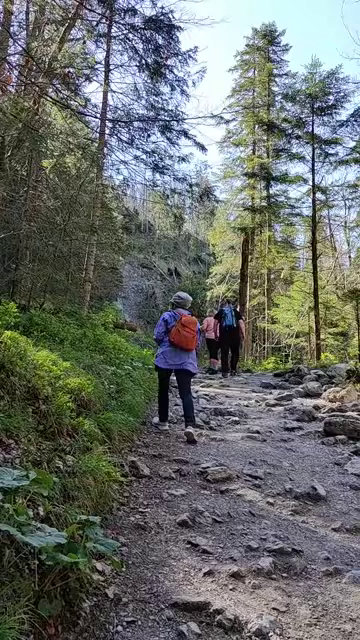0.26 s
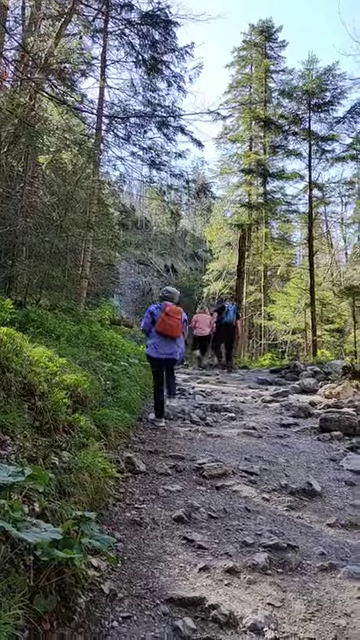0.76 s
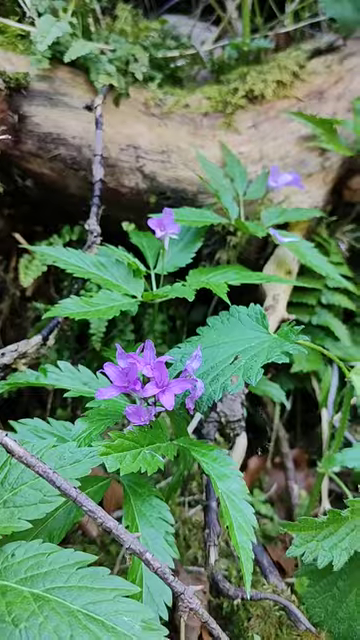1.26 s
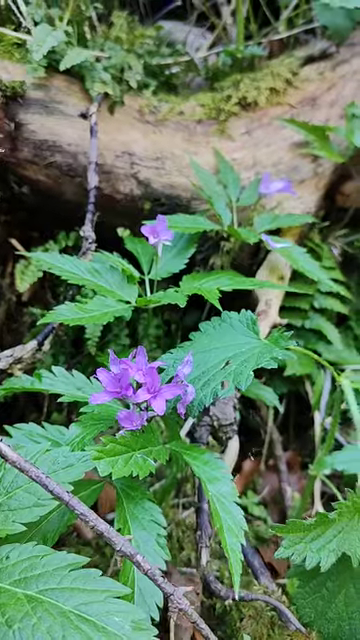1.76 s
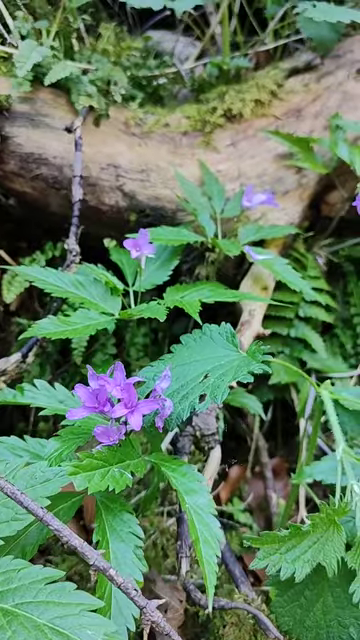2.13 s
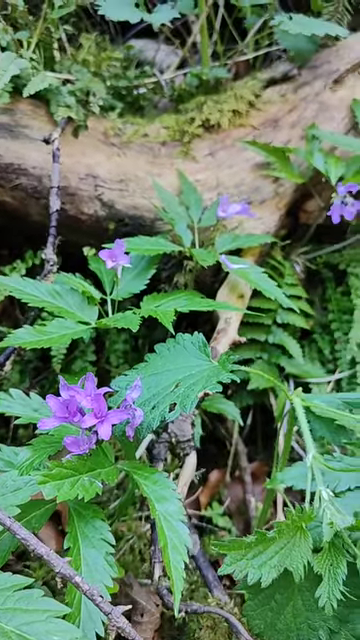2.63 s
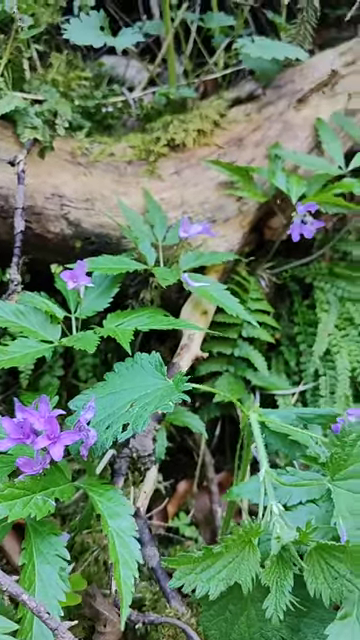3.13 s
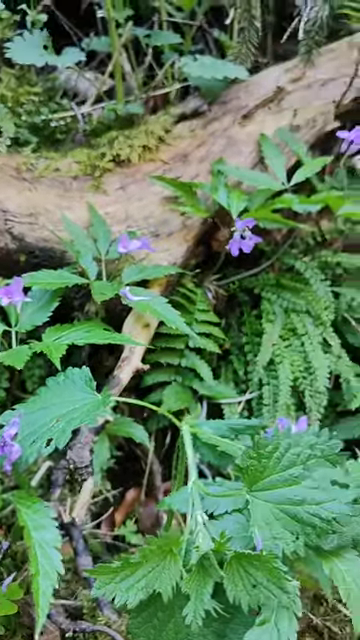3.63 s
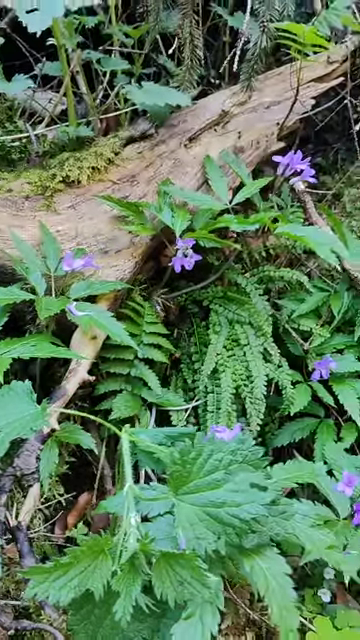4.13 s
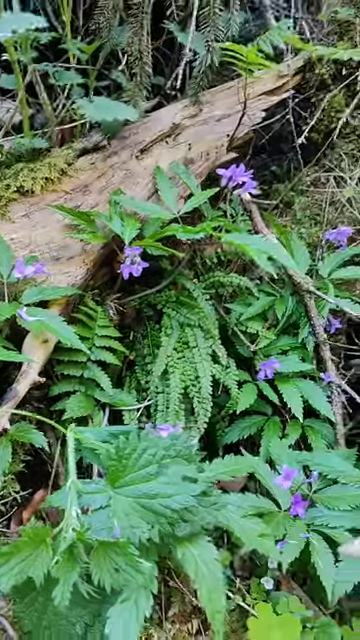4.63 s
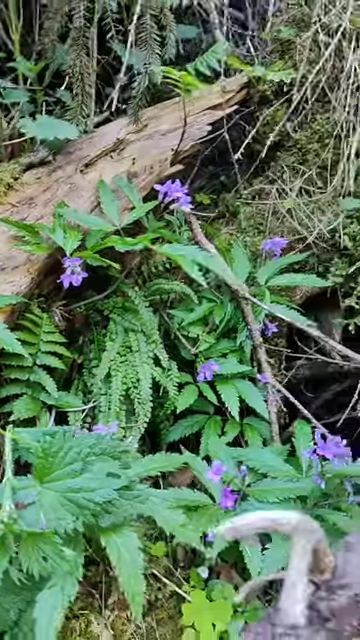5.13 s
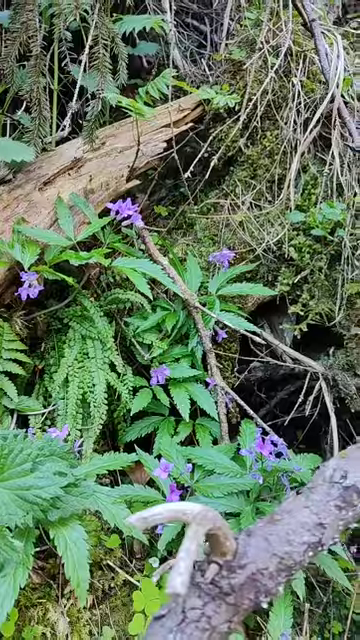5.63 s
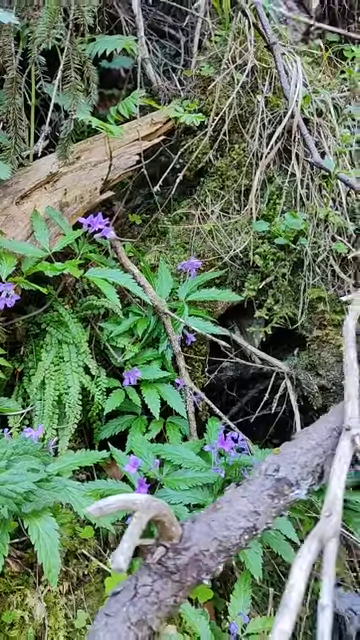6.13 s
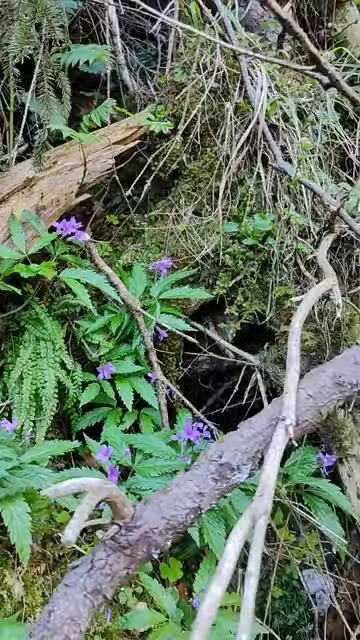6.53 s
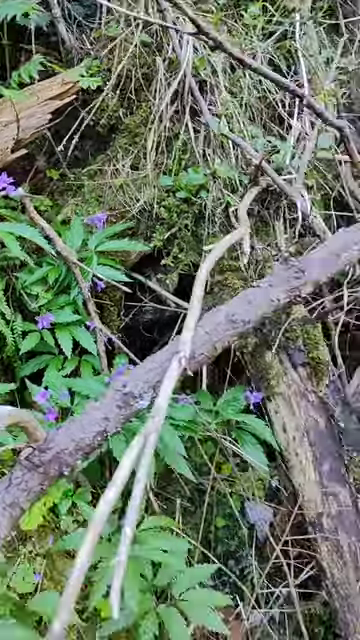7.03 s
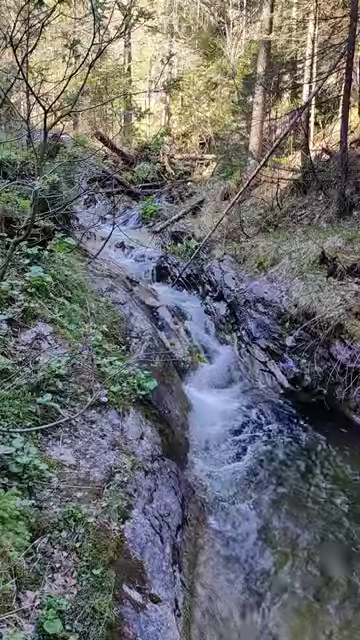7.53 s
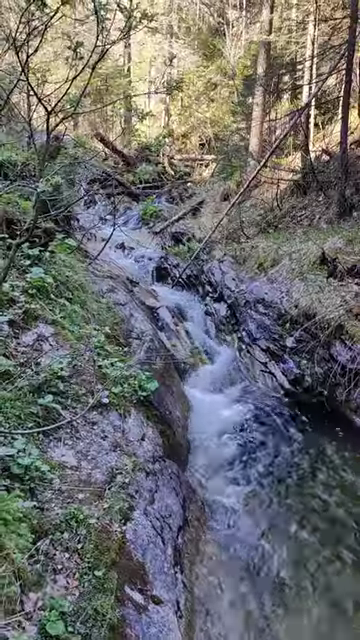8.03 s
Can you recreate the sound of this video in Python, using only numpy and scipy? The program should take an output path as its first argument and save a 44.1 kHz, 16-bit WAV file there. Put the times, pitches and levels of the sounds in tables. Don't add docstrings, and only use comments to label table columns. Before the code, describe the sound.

Outdoor stereo sound from a handheld phone: a smooth, thin water rush beside a trail cuts off abruptly, then a nearer stream fades in by a mossy bank. A clustered snap and knock stands out early, followed by scattered drops, hollow glugs and weak far bird notes. After a second short silence the water returns much louder, a full cascade with quick burbles and sharp splashes until the end.

```python
import sys
import numpy as np
from scipy import signal
from scipy.fft import rfft, irfft, next_fast_len
from scipy.io import wavfile
from scipy.ndimage import uniform_filter1d

SR = 44100
rng = np.random.default_rng(int(sys.argv[2]) if len(sys.argv) > 2 else 0)


def transcribe(u):
    v = np.clip(np.atleast_2d(u).T, -1, 1)
    q = np.round(v * 32767).astype(np.int16)
    wavfile.write(sys.argv[1], SR, q)


def undo_db(level):
    steps = np.asarray(level, float) / 20
    return 10 ** steps


N = 365148

# start in seconds, end in seconds.
PLACES = [
    (0, 1.2025),
    (1.2503, 7.1175),
    (7.1582, 8.3),
]
# frequency in Hz, gain in dB.
PORTS = [
    [(1000, -16), (1900, -14), (3400, -27), (4200, -27.5), (5000, -39.5), (5700, -56), (6500, -58),
     (6800, -42), (7500, -33.5), (10500, -37.5), (12000, -31.5), (12800, -65), (14200, -91), (15200, -65)],
    [(1000, -14.5), (1650, -11.5), (2800, -22.5), (3500, -25.5), (4500, -25), (5700, -31.5), (6300, -28.5),
     (6800, -34.5), (7100, -42.5), (8600, -37), (10500, -35.5), (12800, -24), (14800, -18), (15700, -23.5)],
]


def evened(x):
    return x / np.sqrt(np.mean(abs(x) ** 2) + 1e-20)


def read(points, hz, column=1):
    table = np.transpose(points)
    return np.interp(np.log(hz + 1), np.log(table[0] + 1), table[column])


def add(mix, s, sound):
    part = mix[:, round(s * SR):][:, :sound.shape[-1]]
    part += sound[..., :part.shape[-1]]


def sides(pan_db):
    return undo_db(np.array([[pan_db / 2], [-pan_db / 2]]))


def foam(length, share, spread_db):
    size, bubbles = next_fast_len(length + 8192), 0
    per_s, cycles, rise, count = 5000, 6.06, .15, 26
    for hz in np.geomspace(150, 15000, count):
        u = np.arange(int(3 * cycles * SR / hz)) * hz / SR / cycles
        tone = np.sin(2 * np.pi * cycles * (u + rise * u ** 2 / 2))
        ring = tone * np.exp(-2.3 * u) * np.minimum(u / 0.089, 1)
        many = int(per_s / count * np.sqrt(hz / 1500) * length / SR)
        when, chance = rng.random((many, 2)).T
        strength = undo_db(spread_db * np.minimum(-np.log(chance), 5))
        births = np.bincount((when * length).astype(int), strength, length)
        bubbles = bubbles + evened(rfft(births, size) * rfft(ring, size)) * np.sqrt(hz)
    bubbles = bubbles / np.sqrt(uniform_filter1d(abs(bubbles) ** 2, size=size // 400))
    near = np.sqrt(share) * evened(irfft(bubbles)[:length])
    blur = np.sqrt(1 - share) * rng.standard_normal(length)
    return signal.stft(near + blur, nperseg=1024, noverlap=768)[2]


def rush(k):
    # time in seconds, rush in dB, turn of the phone to the pool from 0 to about 1.
    flow = [
        [(0.0, -41, 0.6), (0.6, -40.5, .5), (1.19, -40, 0.43)],
        [(1.55, -37.5, .1), (2.3, -37.5, .2), (3.0, -37.5, 0.07), (3.8, -38, 0.4), (4.5, -38, 0.52),
         (5.4, -37, 0.48), (6.1, -38.2, .65), (6.75, -39, 0.83), (7.1, -38.5, 1.1)],
        [(7.42, -30, 0.57), (7.84, -29, .4), (8.28, -29, 0.35)],
    ]
    # frequency in Hz, level in dB per Hz.
    water = [
        [(25, -23.7), (80, -15.5), (180, 2), (240, -3.5), (310, 1), (410, -6.2), (500, -11), (720, -10.5),
         (950, -4), (1350, -6), (2350, -0.0), (2900, -1.5), (5200, -2.1), (13000, -3.8)],
        [(25, -25), (80, -2), (180, -0.5), (240, -6), (310, 6), (410, 1.2), (500, -6.5), (720, -4.5),
         (950, 1.34), (1350, -0.3), (2350, 1), (2900, -0.64), (5200, 0.0), (13000, -0.5)],
        [(25, -16), (80, -4.5), (180, 7), (240, 3.5), (310, 11.5), (410, 7.9), (500, 4), (720, 6), (950, 11.5),
         (1350, 6), (2350, 10.5), (2900, 8.5), (5200, 10.5), (13000, 8)],
    ]
    # frequency in Hz, left minus right in dB.
    leaning = [
        [(60, 0), (300, 1.5), (800, -0.5), (1500, 4), (2350, -8.5), (2900, -7), (4000, -1.5), (5300, -5.5),
         (7000, -4), (9000, -3.8), (12000, 4), (13800, 4)],
        [(60, -1.8), (300, 3), (800, 2), (1500, -1.4), (2350, -0.2), (2900, 2.7), (4000, -0.4), (5300, 1.2),
         (7000, 0), (9000, -0.7), (12000, 0), (13800, 0.3)],
        [(60, 0.5), (300, 2), (800, 1), (1500, 0.6), (2350, -6.5), (2900, 4), (4000, -3.5), (5300, -1.5),
         (7000, -1), (9000, -2), (12000, 4), (13800, 2.5)],
    ]
    # frequency in Hz, likeness from 0 to 1, lead of right in radians.
    likeness = [
        [(170, 1, -0.5), (430, 0.98, 0.5), (690, 0.72, 0.0), (1000, 0.61, -0.5), (1400, 0.6, -1),
         (1800, 0.3, 1.5), (2400, 0.6, 0.4), (3400, 0.3, 1.5), (5000, 0.07, 4)],
        [(170, 0.91, 0.0), (428, 0.92, 0.08), (690, 0.69, 0.47), (1000, 0.61, 0.25), (1400, 0.51, -0.5),
         (1850, 0.5, -1.5), (2400, 0.04, -2), (3400, 0.07, -4), (5000, 0.01, -6)],
        [(170, 0.99, 0.0), (430, 0.91, 0.2), (690, 0.8, 0), (1000, 0.6, 0.4), (1400, 0.46, 0.1),
         (1800, 0.46, 0.7), (2370, 0.42, -0.1), (3400, 0, -0.7), (5000, 0.12, -0.4)],
    ]
    # bubble share from 0 to 1, bubble size spread, patch and flicker in dB.
    texture = [
        (.3, 2.5, 1, .5),
        (.4, 2.5, 0.68, 0.55),
        (.45, 2, 1, 0.75),
    ]
    share, spread_db, patch_db, flicker_db = texture[k]
    start, end = PLACES[k]
    length = round((end - start) * SR)
    left, other = foam(length, share, spread_db), foam(length, share, spread_db)
    hz = np.fft.rfftfreq(1024, 1 / SR)
    t = start + np.arange(left.shape[1]) * 256 / SR

    same = np.clip(read(likeness[k], hz), 0, 1)[:, None]
    lead = np.exp(1j * read(likeness[k], hz, column=2))[:, None]
    right = same * lead * left + np.sqrt(1 - same ** 2) * other
    z = np.array([left, right])

    lean = read(leaning[k], hz) / 2
    ports_db = np.array([read(PORTS[0], hz) + lean, read(PORTS[1], hz) - lean])
    bass_loss = np.clip(hz / 45, 0, 1) ** 2
    z = z * (undo_db(read(water[k], hz) + ports_db) * bass_loss)[..., None]
    body = (hz > 500) & (hz < 3000)
    z = z / np.sqrt(4 / 3 * np.sum(np.mean(abs(z.mean(0)[body]) ** 2, 1)))

    s, *columns = np.transpose(flow[k])
    rush_db, turn = (np.interp(t, s, c) for c in columns)
    chance = rng.standard_normal(left.shape[::-1]).T
    slow = [evened(uniform_filter1d(row, size=30)) for row in chance[1:5]]
    field = rush_db + 0.4 * slow[-1]
    # band edges in Hz, effect of the turn in dB, wander in dB.
    bands = [([130, 200, 250, 290], 6.5, 1.5),
             ([250, 290, 460, 560], 3.5, 1),
             ([2500, 4500, 20000, 30000], 4, 0.57)]
    for (edges, turn_db, wander_db), drift in zip(bands, slow):
        reach = np.interp(hz, edges, [0, 1, 1, 0])
        field = field + np.outer(reach, turn_db * (turn - turn.mean()) + wander_db * drift)
    patches = uniform_filter1d(uniform_filter1d(chance, size=12, axis=0), size=12, axis=1)
    field += patch_db * evened(patches)
    field += flicker_db * evened(uniform_filter1d(chance[0], size=3))
    return signal.istft(z * undo_db(field), nperseg=1024, noverlap=768)[1][:, :length]


def strike(db, hz, cycles, pan_db):
    u = np.arange(round(cycles * SR / hz)) / (cycles * SR / hz)
    pulse = np.sin(np.pi * u) * np.cos(2 * np.pi * cycles * (u - .5))
    scattered = rng.random((2, 900)) < .02
    echoes = rng.standard_normal((2, 900)) * scattered * undo_db(-11 - np.arange(900) * 0.025)
    echoes[:, 0] = -1
    sound = signal.fftconvolve(echoes, pulse[None], axes=1)
    return undo_db(db) * sides(pan_db) * np.pad(sound, ((0, 0), (22, 0)))


def drops(mix):
    # start in seconds, peak in dB, pitch in Hz, left minus right in dB.
    falling = [(.752, -31.5, 2110, -4), (2.604, -26, 1300, -2), (2.666, -29, 1650, -3),
               (2.713, -26, 1410, -3), (3.153, -26, 1620, 2), (3.4, -27, 1580, -3), (3.585, -26, 1230, -1),
               (3.679, -27, 1410, 3), (4.82, -34, 1040, -1), (4.852, -29, 1040, -1), (5.351, -32, 960, 2),
               (5.609, -28, 1020, -2), (5.786, -29, 990, -1)]
    for s, db, hz, pan_db in falling:
        add(mix, s, strike(db, hz, 4.7, pan_db))


def tick(middle_db, treble_db):
    spray_t60_s = 0.015
    t, hz = np.arange(1024) / SR, abs(np.fft.fftfreq(1024, 1 / SR))
    spray = rng.standard_normal((2, 1024)) * undo_db(1 - 60 * t / spray_t60_s)
    spray[:, 0] = 1
    ports = undo_db(np.array([read(port, hz) for port in PORTS]))
    treble = np.clip((hz - 6500) / 1500, 1e-3, 1 - 1e-3)
    middle = (1 - treble) * np.clip(hz / 4000, .05, 1) ** 2
    sound = 0
    for db, band in ((middle_db, middle), (treble_db + 8.0, treble)):
        minimum_phase = np.conj(signal.hilbert(np.log(ports * band), axis=1))
        ring = np.fft.ifft(np.exp(minimum_phase), axis=1).real
        part = signal.fftconvolve(spray, ring, axes=1)
        sound = sound + undo_db(db) * part / abs(part.mean(0)).max()
    return np.pad(sound, ((0, 0), (40, 0)))


def ticks(mix):
    # start in seconds, peak of the middle in dB, level of the treble in dB (8 below its peak).
    splashes = [(1.4674, -43, -42), (2.5925, -24.5, -26.5), (2.5984, -30, -40), (2.6663, -34, -44),
                (2.8334, -45, -41), (3.1704, -44, -39), (3.3634, -41, -38), (3.3884, -41, -34),
                (3.6894, -39, -43.5), (4.1729, -30.5, -44), (4.2946, -38, -41), (5.3148, -30, -41),
                (5.5598, -34, -47), (5.917, -29, -47), (6.3724, -37, -31), (6.4028, -32, -40),
                (6.4647, -37, -44), (6.8294, -40, -33), (7.4294, -30, -42), (7.7817, -21, -27),
                (8.0691, -28, -36.5), (8.1334, -23, -33)]
    for s, middle_db, treble_db in splashes:
        add(mix, s, tick(middle_db, treble_db))


def pops(mix):
    # start in seconds, peak in dB, pitch in Hz, length in cycles, left minus right in dB.
    snaps = [(2.5745, -23, 1150, 2.6, -1), (2.578, -11, 1050, 2.3, -1.5), (2.582, -20, 1400, 3, -2),
             (2.586, -19, 1570, 4, -3), (2.5895, -22, 1900, 3, -2), (2.5912, -19, 1100, 2, -1),
             (2.596, -27, 1700, 4, -1), (5.315, -16, 1330, 2.4, -1.5), (5.783, -19.5, 1500, 2.2, -1)]
    for s, *row in snaps:
        add(mix, s, strike(*row))


def bubble(db, hz, t60):
    t = np.arange(round(t60 * SR)) / SR
    envelope = undo_db(db - 1 - 60 * t / t60) * (1 - np.exp(-t / 0.0042))
    return envelope * np.sin(2 * np.pi * hz * (t + 1.43 * t ** 2))


def glugs(mix):
    # start in seconds, peak in dB, pitch in Hz.
    closings = [(2.591, -33, 348), (3.401, -29.5, 336), (3.689, -31, 341), (4.119, -28.5, 306),
                (4.31, -28, 300), (4.565, -27.5, 305), (5.524, -34, 293), (6.332, -27.5, 357),
                (6.458, -30, 362), (6.672, -23, 283), (6.802, -29, 291), (7.062, -32, 322),
                (7.098, -32, 352), (7.361, -27, 375), (7.415, -23, 370), (7.538, -37, 369),
                (7.61, -27, 322), (7.658, -34, 357), (7.707, -27, 366), (7.802, -28, 311),
                (7.866, -30, 368), (8.135, -28, 295), (8.23, -30, 290)]
    for s, db, hz in closings:
        add(mix, s, bubble(db, hz, t60=0.14))


def knocks(mix):
    # start in seconds, peak in dB, pitch in Hz, length in cycles, left minus right in dB.
    pushes = [
        (2.5925, -14.5, 630, 1, 1),
        (2.5985, -19, 970, 1.2, 0),
        (6.4028, -23, 930, 1.35, -2),
        (2.586, -30, 187, 3.16, -2),
    ]
    for s, *row in pushes:
        add(mix, s, strike(*row))


def chirp(length, db, first_hz, last_hz):
    hz = np.linspace(first_hz, last_hz, round(length * SR))
    flutter = 1 + .5 * evened(uniform_filter1d(rng.standard_normal((2, len(hz))), size=200))
    tone = np.sin(2 * np.pi * np.cumsum(hz) / SR) * signal.windows.tukey(len(hz), .6)
    return undo_db(db + 2) * sides(-5.0) * flutter * tone


def bird(mix):
    # start in seconds, length in seconds, level in dB, first and last pitch in Hz.
    calls = [(4.61, .03, -54, 4620, 4500), (4.875, .05, -54, 5280, 4750), (5.23, .065, -51, 4070, 4500),
             (5.58, 0.043, -58, 5250, 4900), (5.67, .03, -59, 3950, 3980), (5.935, .035, -50.5, 4350, 4350),
             (6.22, .03, -49, 3050, 2900), (6.305, .03, -49, 3250, 3400), (6.61, .035, -54, 4150, 4330),
             (6.8, 0.064, -49, 2720, 2830), (6.9, .03, -53, 4250, 4170), (6.98, 0.084, -51, 3480, 3600)]
    for s, *row in calls:
        add(mix, s, chirp(*row))


def burbles(mix):
    # start in seconds, peak in dB, pitch in Hz.
    small_ones = [(7.397, -24, 970), (7.419, -19.5, 920), (7.491, -27, 930), (7.54, -29, 950),
                  (7.592, -27, 950), (7.629, -28, 923), (7.684, -24, 853), (7.708, -26, 885),
                  (7.768, -20, 890), (7.79, -21, 793), (7.855, -22, 975), (8.082, -19, 1000),
                  (8.184, -26, 880), (8.232, -24.5, 950)]
    for s, db, hz in small_ones:
        add(mix, s, bubble(db, hz, t60=0.097))


def scene():
    mix = np.zeros((2, N))
    for k, (start, _) in enumerate(PLACES):
        add(mix, start, rush(k))
    for source in (drops, ticks, pops, glugs, knocks, bird, burbles):
        source(mix)
    return mix


def roll_off(x):
    return signal.sosfilt(signal.butter(12, 16930, fs=SR, output="sos"), x)


def record(dry):
    # fade-in in seconds, starting point from 0 to 1, exponent bending the fade.
    fades = [
        (.001, 1, 1),
        (0.28, 0.05, 0.93),
        (0.23, 0.17, 1.33),
    ]
    t, gain = np.arange(N) / SR, np.zeros(N)
    for (start, end), (fade, first, bend) in zip(PLACES, fades):
        inside = (t >= start) & (t < end)
        gain += inside * np.clip(first + (1 - first) * (t - start) / fade, 0, 1) ** bend
    low = signal.firwin(1023, 15760, window=("kaiser", 9), fs=SR)
    return roll_off(signal.oaconvolve(dry * gain, low[None], "same"))


dry = scene()
out = record(dry)
transcribe(out)
```